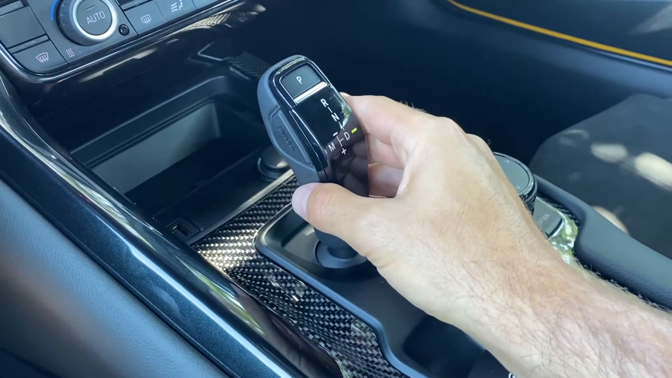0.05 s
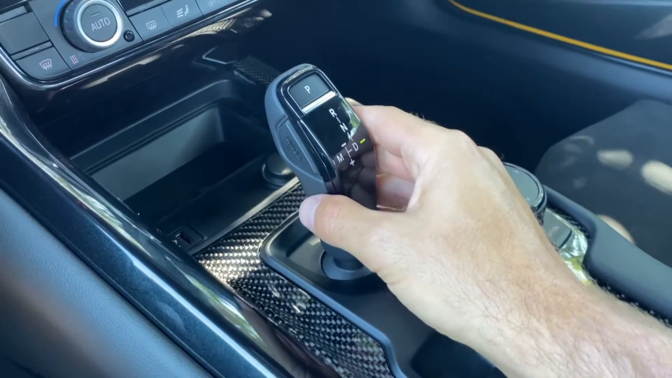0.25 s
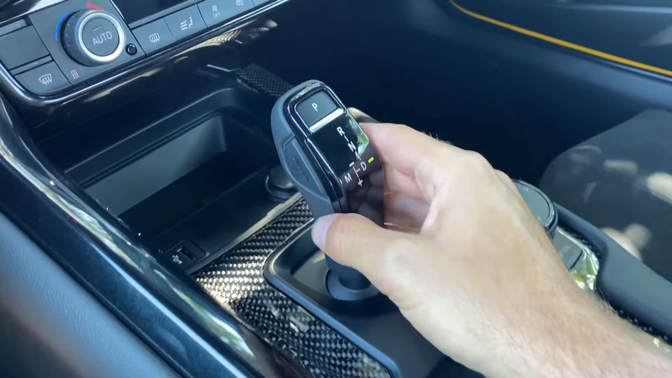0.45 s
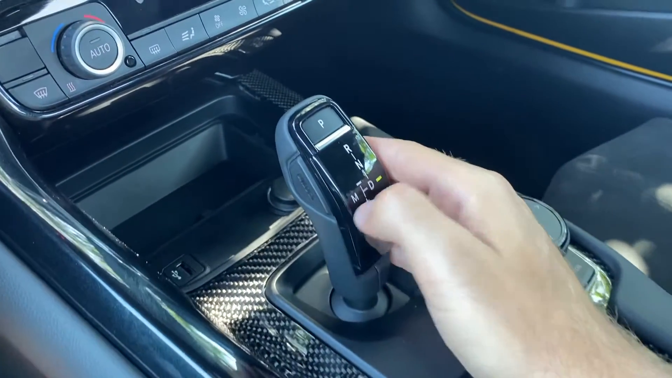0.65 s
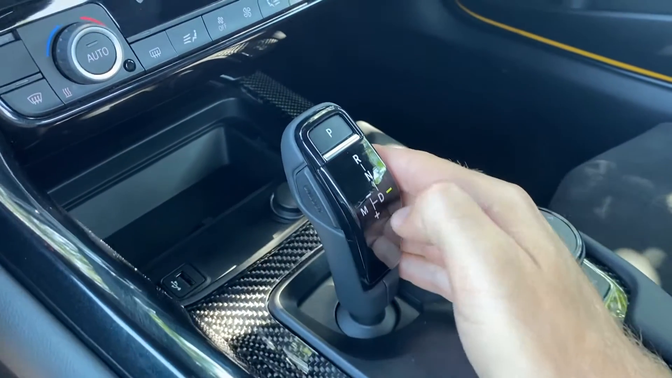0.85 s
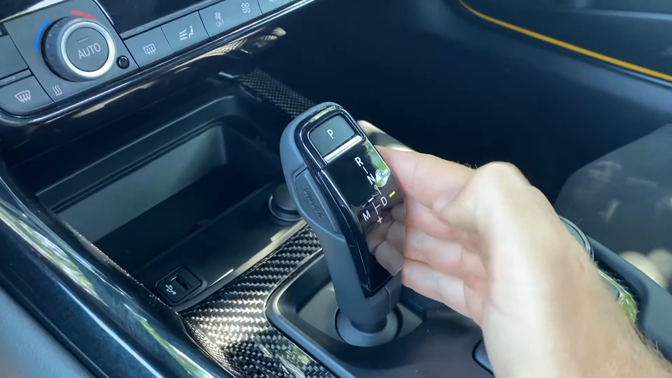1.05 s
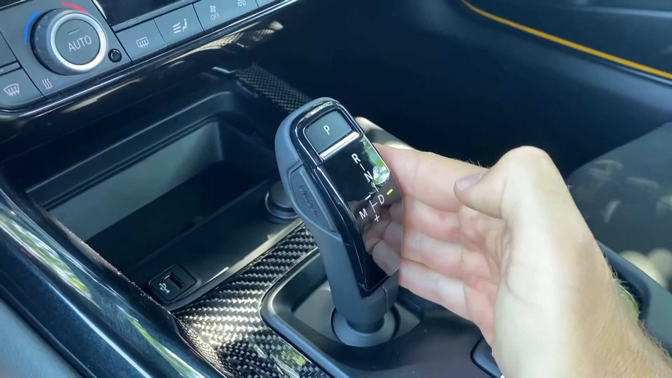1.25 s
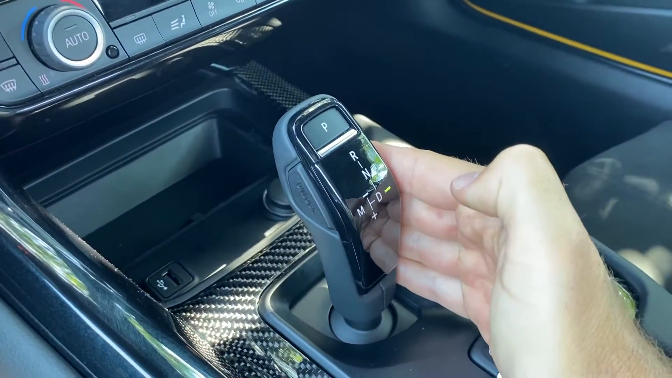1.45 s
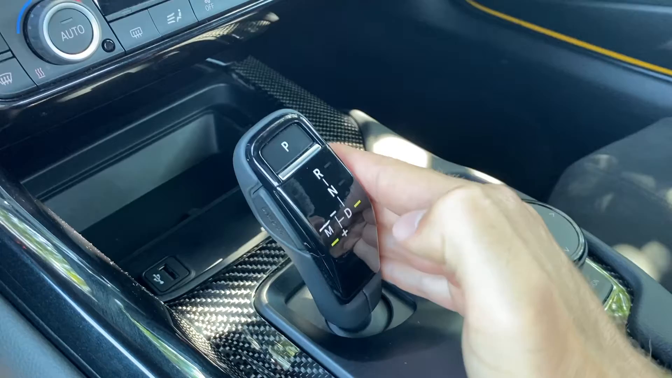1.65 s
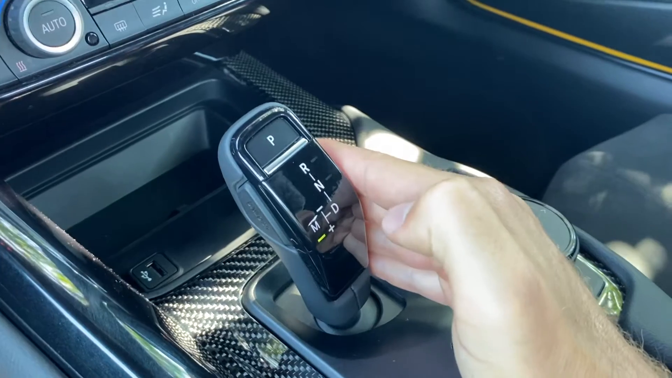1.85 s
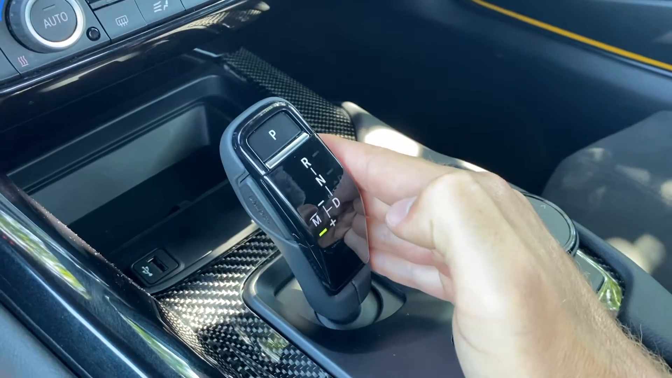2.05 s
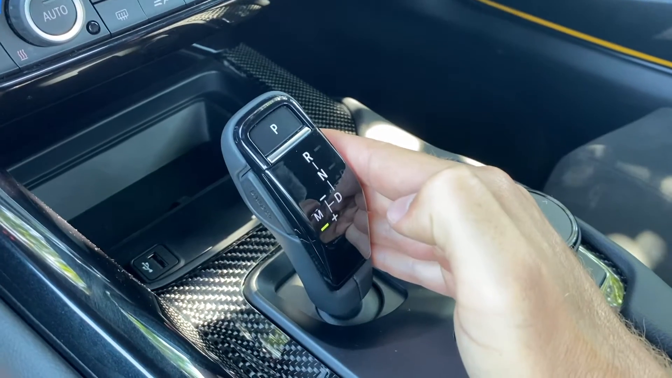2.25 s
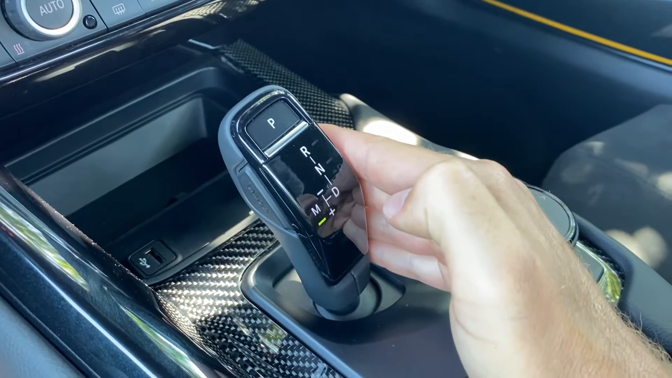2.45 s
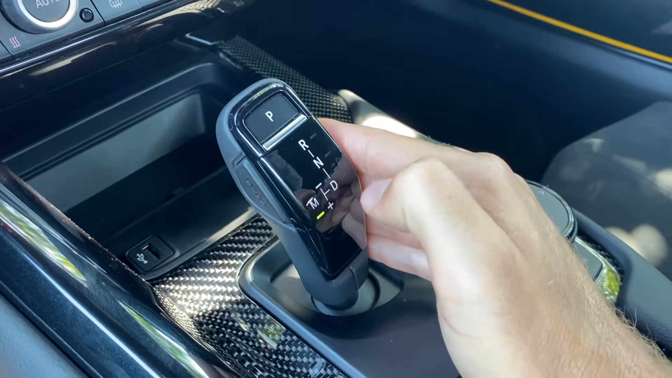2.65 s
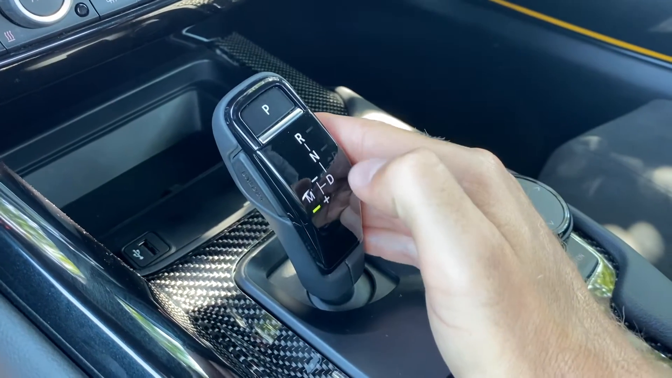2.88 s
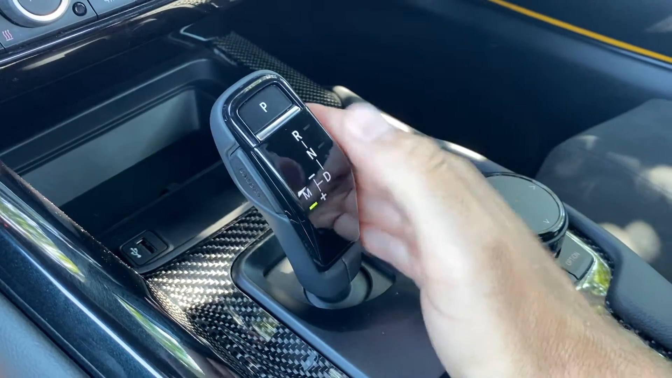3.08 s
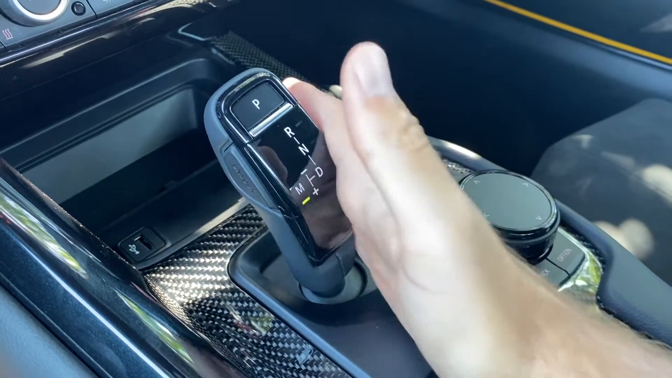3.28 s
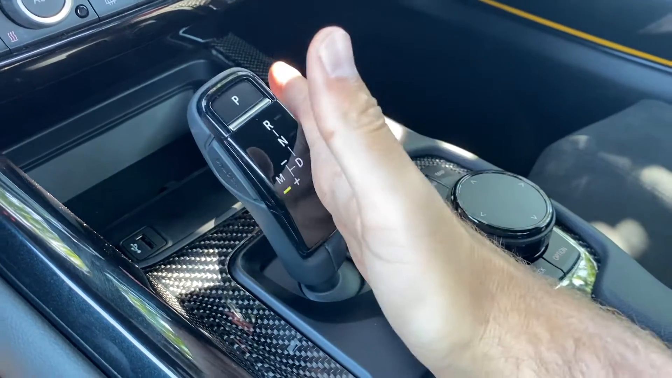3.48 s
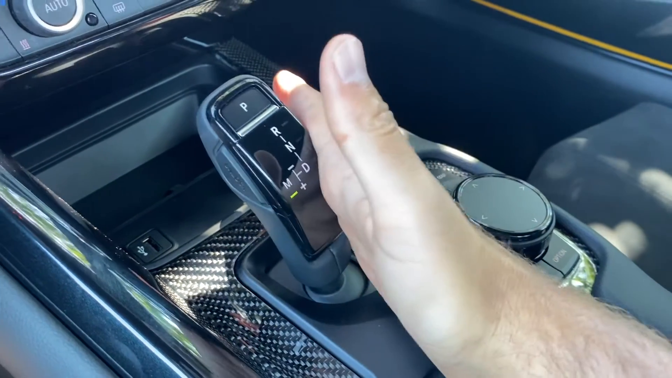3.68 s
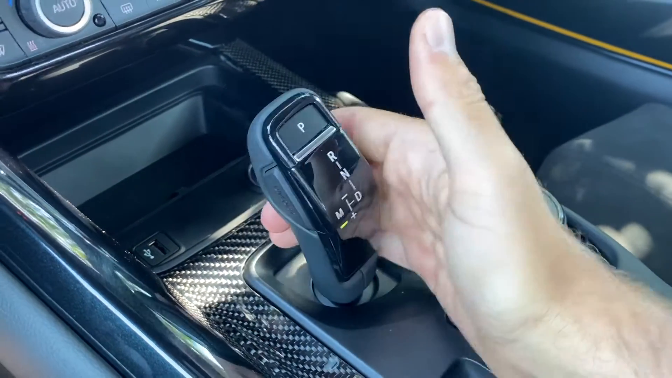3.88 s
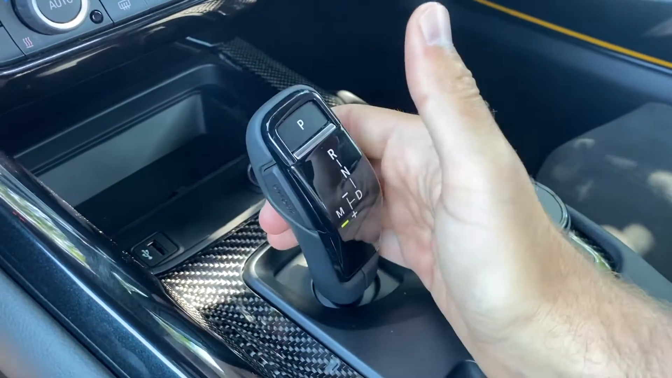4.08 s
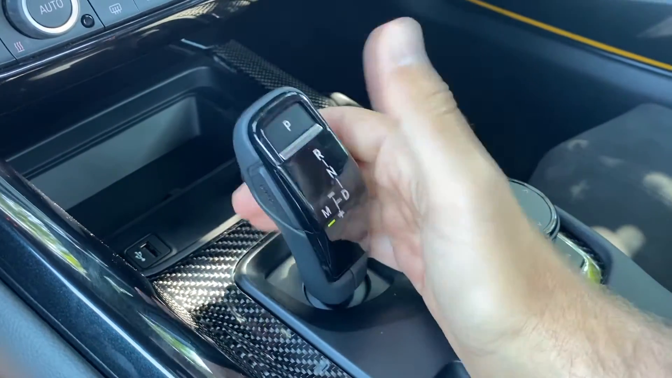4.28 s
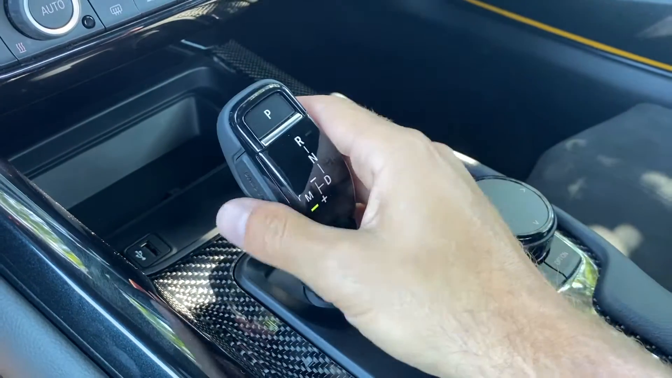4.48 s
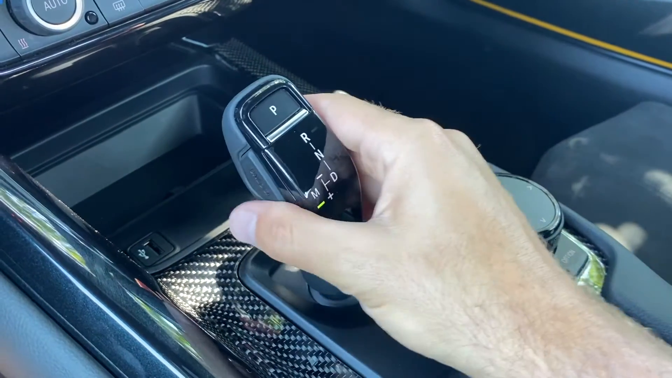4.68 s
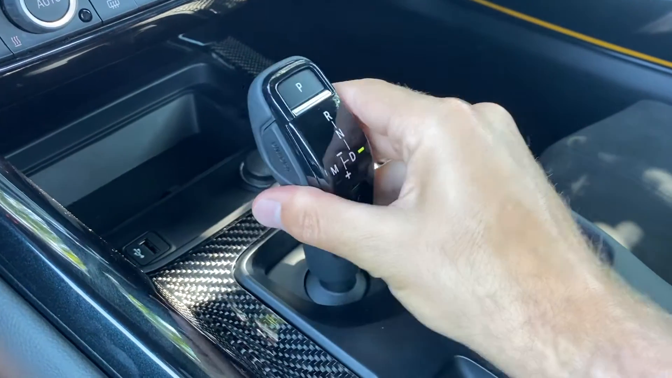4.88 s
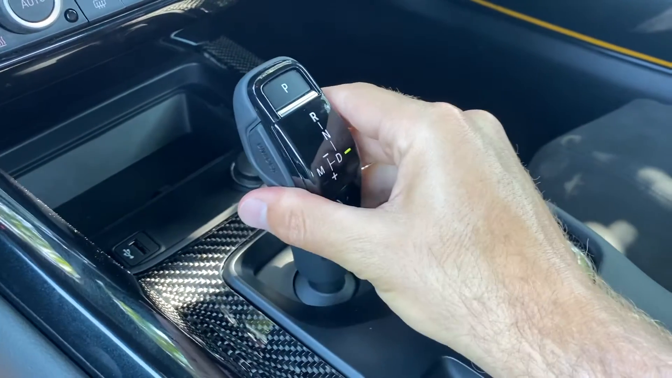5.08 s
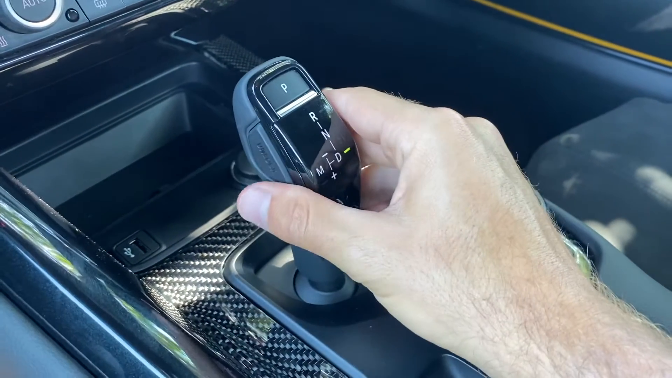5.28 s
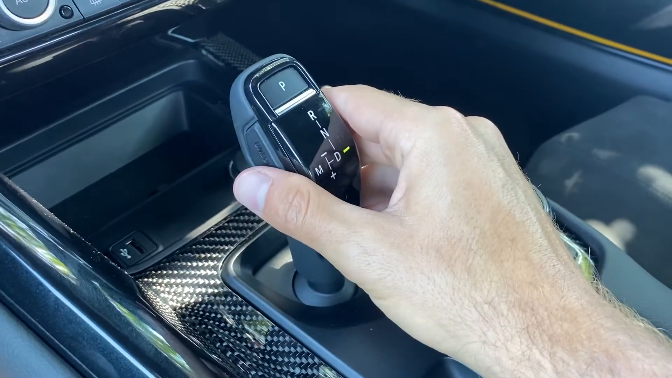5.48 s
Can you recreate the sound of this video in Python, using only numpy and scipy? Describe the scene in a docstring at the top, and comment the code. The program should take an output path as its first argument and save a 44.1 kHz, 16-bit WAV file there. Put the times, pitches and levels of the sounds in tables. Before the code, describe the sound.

Inside a parked car, the engine idles throughout with a steady low hum, under a soft fan rush and very faint electrical whines. At about 0.5 seconds, skin barely brushes the plastic knob of the gear lever. At 1.6 seconds the lever hits its stop with a sharp click and a small thud that briefly rings the console. Only the hum follows until about 3 seconds, when fingers tick and slide lightly on the knob. Four more throws of the lever come at roughly 3.4, 3.85, 4.35 and 4.8 seconds, each a short, hard plastic knock made of a few tightly packed clicks. The one at 4.35 is softer, and the last is the loudest and fullest. A faint touch comes at 5.2 seconds, and the engine idles on until about 5.5 seconds. Everything sounds close, with very little echo in the padded cabin.

```python
"""Inside a parked car, the idling engine hums over fan noise and faint whines; a faint opening hiss
fades within a second. At half a second, skin brushes the plastic knob of the electronic gear lever.
At 1.6 seconds the lever knocks against its stops and the console rings briefly. From about 3 seconds
the skin ticks and slides again, and four more throws of the lever land about half a second apart.
A last light touch comes at 5.2 seconds, and the engine idles on."""
import sys
import numpy as np
from scipy import signal
from scipy.fft import rfft, irfft
from scipy.io import wavfile
from scipy.ndimage import uniform_filter1d

SR = 44100
rng = np.random.default_rng(int(sys.argv[2]) if len(sys.argv) > 2 else 0)


def put_to_file(sound):
    """Save the sound as 16-bit audio at rate SR, in the file named by the first command-line argument."""
    columns = np.atleast_2d(sound).T  # one column per channel
    safe = np.clip(columns, -1, 1)
    whole_steps = np.round(safe * 32767)
    wavfile.write(sys.argv[1], SR, whole_steps.astype(np.int16))


N = 243873

# The lever hitting its stops; one throw lands as several blows. Each row: start in seconds, level
# in dB, bass boost and treble boost in dB per octave away from PIVOT_HZ, boosts in dB for the thud,
# box, shell and knob pitches, then four times in ms: lag at LAG_HZ, build-up, hold and dying away.
LEVER_BLOWS = [(1.594, -60.5, 14, 2, -6, -17, 2, -1, 3.5, 5.7, 1, 11),
               (1.615, -50.5, -3, 3, 0, -4, -9, -1, 2.4, 3.9, 1, 3.9),
               (1.618, -31, 1.5, 1.76, -3, 2, 6, 7.5, 5.16, 2.1, 4.9, 1.7),
               (1.639, -46, 5, -1.5, 15, -2, 6, 3, 4.5, 2.4, 2, 4.8),
               (3.069, -53.5, -8, -36, 0, -2, -1, -18, 0.13, 0.45, 0.39, 1),
               (3.3601, -38, 2.5, -1.5, -9, 3, 0.5, -5, 2.95, 1.4, 1.4, 1.1),
               (3.369, -47.5, 0, -7, -6, 4, -2, -3, 1.4, 2.2, 1.6, 2),
               (3.3770, -44, 1.5, 0, -5, -1, -3, -7, 1.03, 0.4, 1.7, 1.5),
               (3.8086, -51.5, 7.5, 3, -7, -2, -2, 6.5, 3.6, 1.1, 1.4, 2),
               (3.813, -44, 4.5, 0.5, -5, -4, -3, 2.5, 3.26, 1.1, 1.5, 2.3),
               (3.825, -53.5, 6, 0, -7, 4, 0, 3, 3.6, 3, 1, 8.4),
               (3.8472, -33, 5.5, 0.5, 4, -9, -1, -9, 1.74, 0.27, 2.8, 1.2),
               (3.8521, -37.5, 4.5, 4, -5, -5, 2, -3.5, 1.15, 1.2, 1.8, 2.1),
               (3.862, -50.5, 3, -11, -10, -8, 4, 8, 1.15, 2.6, 1, 3),
               (4.3422, -57, -11, 5.5, -2, -2, -3, 0, 3.1, 1.4, 0.7, 1.3),
               (4.3475, -47, -14, 3, 0, -2, -6, -9, 1.1, 0.93, 0.91, 1),
               (4.351, -44.5, 4, -2, -8, 11.5, -5, 2.5, 1.1, 1.1, 0.5, 0.89),
               (4.3604, -45.5, -3.5, -0.5, -1.5, 12.5, -3, -2.5, 1.16, 2, 3, 2.3),
               (4.372, -54, 1, 0, 0, 4, -4, 1, 0.76, 1.2, 1, 3.3),
               (4.390, -58.5, 10, -4, 4, 7.5, -4, 2.5, 0.92, 3, 1, 3.3),
               (4.804, -51.5, 4.5, 0, -6, 4, 3, 2, 2.1, 3.3, 1, 12),
               (4.8225, -28.5, 4.5, 0, 14, -12, -2, 0.5, 3.43, 1.94, 2.3, 3.5),
               (4.839, -40.5, 4.5, -13, 14, -18, 5.5, -2.5, 3.5, 2.3, 1, 3.5),
               (4.91, -55.5, 8, -10, 2, -10, 3, -10, 1.7, 2.5, 1.2, 2)]
# The tone colour all blows share. Each row: pitch in Hz, boost in dB.
BLOW_COLOUR = [(110, -12), (200, -11.5), (450, -8.5), (900, 2.87), (2500, -9.5), (9000, -16)]
# The crack of a hard contact. Each row: pitch in Hz, boost in dB.
CRACK_COLOUR = [(250, 22), (450, 28.5), (900, 0), (2500, 29.5), (4000, 20.5), (6000, 16), (8000, 18),
                (10500, 10), (13000, 7), (15500, 3)]
# The notes the console and panels ring at. Each row: pitch in Hz, boost in dB, seconds to fade 60 dB.
CONSOLE_NOTES = [(97, -23, 0.087), (127, -23, 0.083), (160, -18, 0.058), (221, -12, 0.091),
                 (256.3, 2.5, 0.086), (321.7, 0, 0.091), (360, -15.5, 0.099), (451.6, -2, 0.062),
                 (547.6, -1.5, 0.066), (652, -11.5, 0.034), (769, 1.5, 0.015), (853, -7.5, 0.03),
                 (945, -2, 0.016), (1176, -5.5, 0.012), (1296, -6.5, 0.013), (1534, 0, 0.014),
                 (1721, 2, 0.01), (2072, -1.5, 0.012), (2358, -5.5, 0.015), (2750, -5.5, 0.0024),
                 (3690, -10, 0.031), (4400, -20, 0.0013), (7700, -32, 0.029)]
# Skin landing on the knob or peeling off. Each row: start in seconds, relative level in dB,
# centre pitch in Hz, width in octaves.
SKIN_TICKS = [(.514, -78, 2640, 0.81), (.5145, -85, 6000, 1), (2.917, -81.5, 2280, 0.83),
              (2.968, -89, 10600, 1.5), (2.985, -84, 10000, 1.2), (3.056, -80, 7000, 0.86),
              (3.062, -73, 12440, 0.87), (3.057, -76, 2420, 0.45), (3.0662, -65, 5200, 1.5),
              (3.065, -63, 2710, 0.47), (3.074, -59, 5300, 1.8), (3.309, -73, 2500, 0.74),
              (3.316, -67.5, 2160, 0.46), (3.317, -76, 7000, 1.2), (3.753, -82, 7400, 0.7),
              (3.907, -78, 3400, 0.98), (3.919, -80, 2800, 1.3), (4.227, -79.5, 5500, 0.73),
              (4.257, -66.5, 5440, 5.9), (4.706, -78, 3200, 0.85), (4.738, -77, 4130, 1.1),
              (4.966, -80.5, 2610, 0.31), (4.974, -80, 2810, 1.4), (5.208, -75, 2730, 0.6)]
# The first row is a faint background hiss at the start that fades within a second; the rest are
# skin sliding on the knob. Each row: loudest moment in seconds, relative level there in dB,
# swell and fade in seconds, centre pitch in Hz, width in octaves.
HISSES = [(.02, -102, .02, .9, 3500, 1.5), (.485, -90.5, 0.084, 0.08, 5500, 1.3),
          (2.97, -84.5, .03, .035, 10500, 1.2), (3.078, -76, 0.045, 0.03, 6500, 2),
          (3.14, -86, 0.13, 0.12, 4800, 1.1), (3.29, -77, 0.082, 0.093, 4670, 1.8),
          (3.32, -79.5, 0.028, 0.06, 4500, 2.5), (3.38, -68, 0.046, 0.044, 6200, 1.5),
          (3.80, -84.5, 0.15, 0.086, 4200, 1.4), (3.915, -85, .02, 0.064, 3500, 1.5),
          (4.335, -78, .02, 0.022, 4500, 1.2), (4.972, -88, .02, .03, 3000, 2.1),
          (4.735, -88, 0.043, 0.22, 5000, 1.6), (5.211, -85, .02, 0.035, 5100, 1.6)]
# The idling engine. Each row: time in seconds, firings per second, hum level in dB.
ENGINE_IDLE = [(0.0, 57.23, -46), (1.0, 57.44, -46.5), (2.46, 57.13, -46), (2.59, 55.8, -45.5),
               (3.67, 56.13, -46), (3.901, 56.42, -43.5), (4.149, 55.2, -45.5), (4.999, 56.3, -43.5),
               (5.53, 55.56, -46.5)]
# The tones in the hum. Each row: multiple of the firing rate, boost in dB, waver in dB.
ENGINE_TONES = [(0.5, -27.5, 6), (0.75, -23.5, 6), (1, 0.5, 0.5), (1.502, -20, -2), (2.005, -31.5, -0.5),
                (2.498, -28, 4.5), (3, -38, -1.5), (3.999, -31.5, -2)]
# The noise of the fan and car body. Each row: pitch in Hz, relative level in dB.
FAN_COLOUR = [(53, -29.5), (90, -4), (109, -16), (183, -19), (328, -21), (373, -26.5), (434, -27),
              (483, -28.5), (922, -34), (1050, -44), (1360, -41.5), (4640, -57.5), (13000, -59),
              (15500, -74)]
# Whines of the fan and electrics. Each row: pitch in Hz, width in Hz, level in dB.
FAN_WHINES = [(328.2, 9.1, -74), (428.4, 20, -78), (1169, 33, -87), (5270, 13, -107)]
# A thin electric tone that fades and comes back. Each row: time in seconds, level in dB.
THIN_TONE_LEVELS = [(0, -104), (0.5, -105), (0.8, -116), (3.0, -116), (3.6, -105), (5.53, -102)]

PIVOT_HZ, LAG_HZ = 900, 250   # where bass meets treble; the pitch at which a blow's lag is given
THUD_HZ, BOX_HZ, SHELL_HZ, KNOB_HZ = 140, 335, 510, 750   # where a blow lands sets how much each sounds
DETUNE = 0.02   # the grip shifts each console note by about this fraction from blow to blow
TICK_DECAY_S, HISS_DEPTH_DB = .0017, 25   # a hiss swells and fades by this depth
SWAY_DB, SWAY_BELOW_HZ = -56, 5.6
FAN_DB, TONE_DB, TONE_HZ, THIN_TONE_HZ = -63.5, -82.5, 1044, 5200
ECHO_FADE_S, ECHO_DB = 0.067, -11.5   # the echo falls 60 dB in this time
ECHO_BAND_HZ = [710, 17800]   # the cabin air adds little below; upholstery dulls what is above


def lever():
    """Each blow on the stops is a chatter of tiny touches that makes a crack and rings the console."""
    out, size, lead = np.zeros(N + SR), SR // 3, SR // 40
    ms = (np.arange(size) - lead) / SR * 1000
    for start, level_db, bass, treble, *landing_db, lag_ms, rise_ms, hold_ms, decay_ms in LEVER_BLOWS:
        colour = []
        for hz, db in BLOW_COLOUR:
            octaves_away = abs(np.log2(hz / PIVOT_HZ))
            colour.append((hz, level_db + db + octaves_away * (bass if hz < PIVOT_HZ else treble)))
        touches = chatter(ms, rise_ms, hold_ms, decay_ms)
        knock = crack(touches, colour) + console(touches, colour, landing_db, ms, lag_ms)
        at = round(start * SR) - lead
        out[at:at + size] += knock
    # the knocks carry no deep bass below about 75 Hz
    return signal.sosfilt(signal.butter(2, 75, "high", fs=SR, output="sos"), out[:N])


def chatter(ms, rise_ms, hold_ms, decay_ms, per_second=7000):
    """The parts touch many times at random; the touches build up, hold and die away."""
    touches = rng.standard_normal(len(ms)) * (rng.random(len(ms)) < per_second / SR)
    rising = ms / max(rise_ms, .3)
    dying = -np.maximum(ms - hold_ms, 0) / max(decay_ms, 1)
    touches *= np.exp(np.where(ms < 0, rising, dying))
    return even_out(touches, width_hz=600) + 1e-18


def crack(touches, colour):
    """The hard contact itself makes a sharp crack with no thud in it."""
    crack_colour = [(hz, db + at_hz(colour, hz)) for hz, db in CRACK_COLOUR]
    burst = shape_bands([touches], crack_colour, low_hz=226.0)
    return signal.lfilter(*signal.butter(2, 220, "high", fs=SR), burst)


def console(touches, colour, landing_db, ms, lag_ms):
    """Each note of the console takes up the part of the blow near its own pitch and rings on."""
    thud_db, box_db, shell_db, knob_db = landing_db
    landing = [(THUD_HZ, thud_db), (230, 0), (BOX_HZ, box_db), (SHELL_HZ * .88, shell_db),
               (SHELL_HZ * 1.12, shell_db), (KNOB_HZ, knob_db), (940, 0)]
    out = np.zeros(len(ms))
    for hz, db, fade_s in CONSOLE_NOTES:
        push = signal.lfilter(*signal.butter(1, [hz / 2, 2 * hz], "band", fs=SR), touches)
        note = ring(push, hz * (1 + DETUNE * rng.standard_normal()), fade_s)
        note = np.interp(ms - lag_ms * LAG_HZ / hz, ms, note)   # big, low panels get moving later
        out += from_db(db + at_hz(colour, hz) + at_hz(landing, hz)) * note / np.abs(note).max()
    return out


def skin_ticks():
    """Skin landing on the knob or peeling off makes a tiny burst of noise."""
    out, size = np.zeros(N), 800
    for start, db, hz, octaves in SKIN_TICKS:
        burst = rng.standard_normal(size) * np.exp(-np.arange(size) / SR / TICK_DECAY_S)
        tick = band_around(burst, hz, octaves, order=2)
        opening_level = np.sqrt(np.mean(tick[:size // 10] ** 2))
        at = round(start * SR)
        out[at:at + size] += from_db(db) * tick / opening_level
    return out


def hisses():
    """Grainy noise swells and fades: first a faint background hiss, then skin rubbing the plastic."""
    out = np.zeros(N)
    grains = rng.standard_normal(N) * from_db(1.2 * rng.exponential(1, N // 40 + 1).repeat(40)[:N])
    for peak, db, swell, fade, hz, octaves in HISSES:
        start, end = peak - swell, peak + fade
        span = np.arange(max(round(start * SR), 0), min(round(end * SR), N))
        level_db = db - np.interp(span / SR, [start, peak, end], [HISS_DEPTH_DB, 0, HISS_DEPTH_DB])
        out[span] += from_db(level_db) * unit_level(band_around(grains[span], hz, octaves, order=1))
    return out


def engine():
    """Wavering tones follow the engine's firing; beneath them the car body rocks too slowly to hear."""
    times, firing_hz, hum_db = np.transpose(ENGINE_IDLE)
    t = np.arange(N) / SR
    phase = 2 * np.pi * np.cumsum(np.interp(t, times, firing_hz)) / SR
    hum = np.zeros(N)
    for multiple, db, waver_db in ENGINE_TONES:
        gain = from_db(db + waver_db * drift(12.0))
        hum += gain * np.sin(multiple * phase + rng.uniform(0, 2 * np.pi))
    slow_only = signal.butter(4, SWAY_BELOW_HZ, fs=SR, output="sos")
    sway = signal.sosfilt(slow_only, rng.standard_normal(N + SR))[SR:]
    return np.sqrt(2) * from_db(np.interp(t, times, hum_db)) * hum + from_db(SWAY_DB) * unit_level(sway)


def fan_and_electrics():
    """The fan makes a smooth rush; a few narrow whines from it and the electrics stand out."""
    t = np.arange(N) / SR
    rush = shape_bands(rng.standard_normal((2, N)), FAN_COLOUR, low_hz=68.3)
    out = from_db(FAN_DB) * unit_level(rush)
    wavering_db = TONE_DB + 2.3 * drift(13.0)
    thin_db = np.interp(t, *np.transpose(THIN_TONE_LEVELS))
    for hz, db in [(TONE_HZ, wavering_db), (THIN_TONE_HZ, thin_db)]:
        out += np.sqrt(2) * from_db(db) * np.sin(2 * np.pi * hz * t)
    for hz, width_hz, db in FAN_WHINES:
        fade_s = np.log(1000) / np.pi / width_hz   # a narrower whine rings longer
        whine = ring(rng.standard_normal(N + SR), hz, fade_s)[SR:]
        out += from_db(db) * unit_level(whine)
    return out


def cabin(x):
    """The small padded cabin adds a short, dense echo to a sound."""
    t = np.arange(SR // 4) / SR
    echo = rng.standard_normal(len(t)) * from_db(-60 * t / ECHO_FADE_S) * (t > .003)
    echo = signal.lfilter(*signal.butter(1, ECHO_BAND_HZ, "band", fs=SR), even_out(echo, width_hz=263.0))
    echo /= np.sqrt(np.sum(echo ** 2))
    return x + from_db(ECHO_DB) * signal.fftconvolve(x, echo)[:N]


def from_db(db):
    """Turn decibels into a number to multiply by."""
    return 10 ** (np.asarray(db) / 20)


def unit_level(x):
    """Scale a sound so its average level (root mean square) is 1."""
    return x / np.sqrt(np.mean(x ** 2) + 1e-20)


def at_hz(points, hz):
    """Read between the rows of a pitch-and-value table, spacing pitches by octaves."""
    pitches, values = np.transpose(points)
    return np.interp(np.log(hz), np.log(pitches), values)


def drift(rate):
    """A random wander of typical size 1 that changes about `rate` times a second."""
    r = np.exp(-80 * np.pi * rate / SR)
    slow = signal.lfilter([1], [1, -2 * r, r * r], rng.standard_normal(N // 40 + 4002))[4000:]
    return np.interp(np.arange(N) / 40, np.arange(len(slow)), unit_level(slow - slow.mean()))


def ring(x, hz, fade_s):
    """Let a sound set one note ringing; the note falls 60 dB in fade_s seconds."""
    r, w = from_db(-60 / (fade_s * SR)), 2 * np.pi * hz / SR
    return signal.lfilter([0, np.sin(w)], [1, -2 * r * np.cos(w), r * r], x)


def band_around(x, hz, octaves, order):
    """Keep the pitches around hz; a higher order gives steeper edges."""
    spread = 2 ** (octaves / 2)
    edges = [hz / spread, min(hz * spread, 20000)]
    return signal.sosfilt(signal.butter(order, edges, "band", fs=SR, output="sos"), x)


def shape_bands(sounds, colour, low_hz):
    """Build a tone colour from bands a third of an octave wide, taken from the sounds in turn."""
    edges = low_hz * 2 ** np.arange(0, np.log2(17000 / low_hz), 1 / 3)
    out = 0
    for k, (low, high) in enumerate(zip(edges, edges[1:])):
        band_filter = signal.butter(2, [low, high], "band", fs=SR, output="sos")
        band = signal.sosfilt(band_filter, sounds[k % len(sounds)])
        out += (-1) ** k * from_db(at_hz(colour, np.sqrt(low * high))) * band   # flips join the edges
    return out


def even_out(x, width_hz):
    """Make a random burst about equally strong at all pitches, with a total energy of 1."""
    spectrum = rfft(x)
    smooth_power = uniform_filter1d(np.abs(spectrum) ** 2, size=int(width_hz * len(x) / SR))
    flat = irfft(spectrum / np.sqrt(smooth_power + 1e-30), len(x))
    return flat / np.sqrt(np.sum(flat ** 2))


def scene():
    """The lever sounds in the cabin over engine and fan; the light ticks and hisses get less echo."""
    light = skin_ticks() + hisses()
    background = engine() + fan_and_electrics()
    in_cabin = cabin(lever() + from_db(1.5) * light) + from_db(-8.5) * light
    return (in_cabin + background)[None, :]


def record(dry):
    """Cut the very highest treble, from about 15900 Hz up."""
    return signal.sosfilt(signal.cheby2(20, 60, 15900, fs=SR, output="sos"), dry)


dry = scene()
out = record(dry)
put_to_file(out)
```